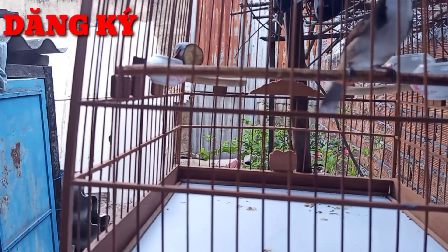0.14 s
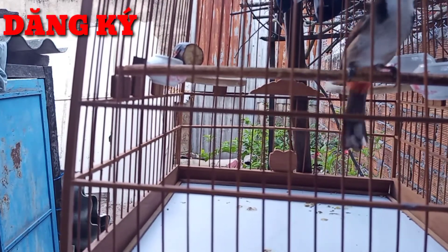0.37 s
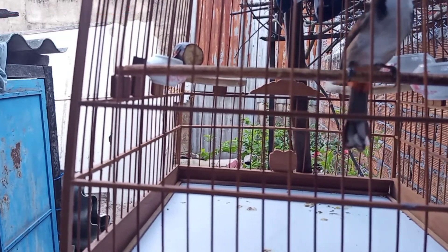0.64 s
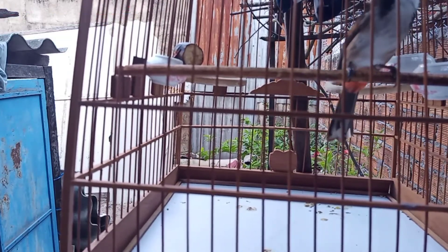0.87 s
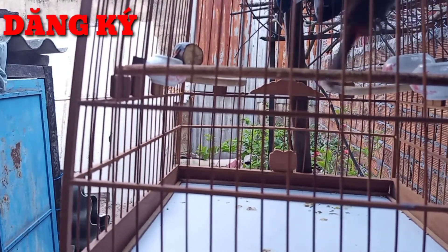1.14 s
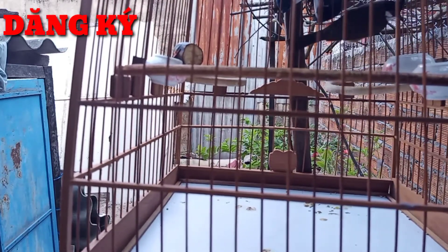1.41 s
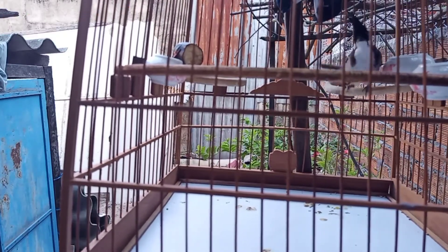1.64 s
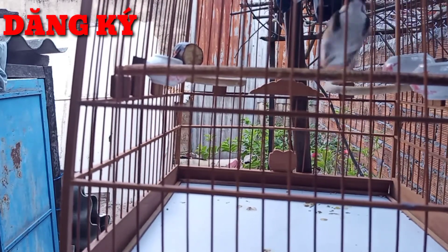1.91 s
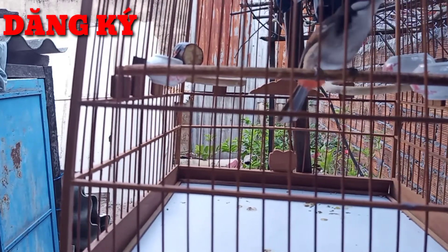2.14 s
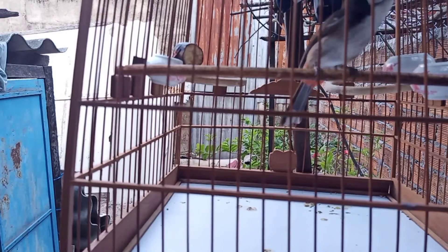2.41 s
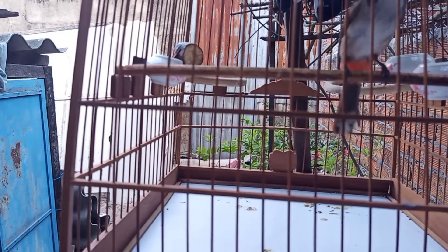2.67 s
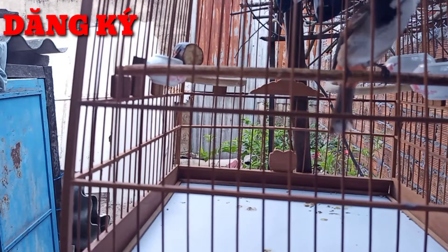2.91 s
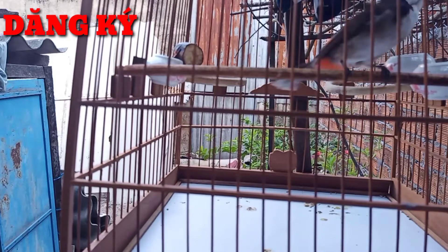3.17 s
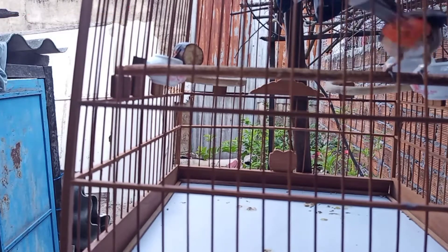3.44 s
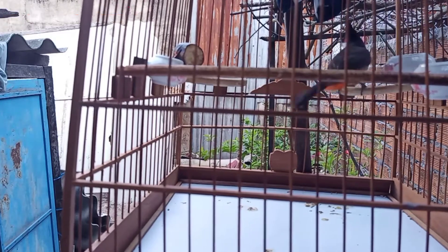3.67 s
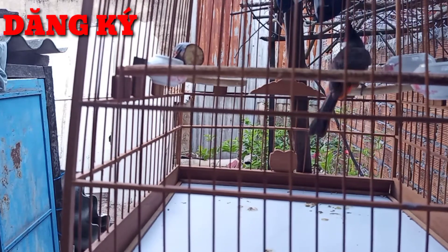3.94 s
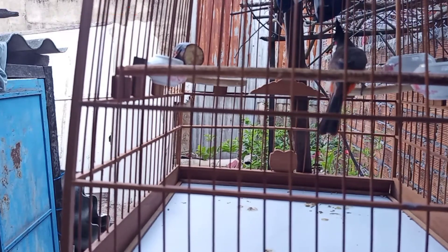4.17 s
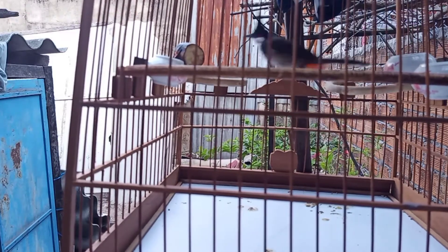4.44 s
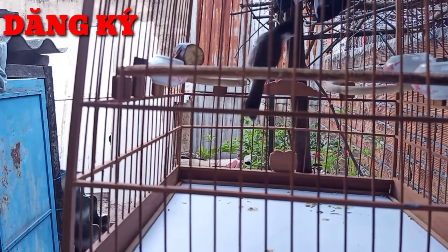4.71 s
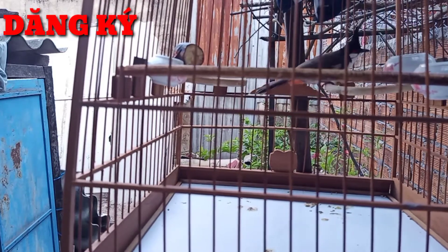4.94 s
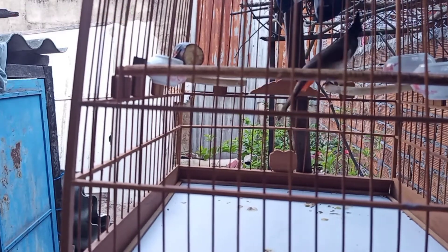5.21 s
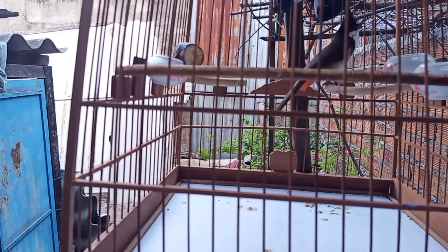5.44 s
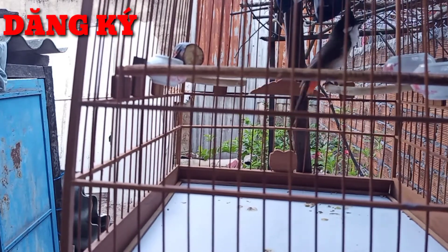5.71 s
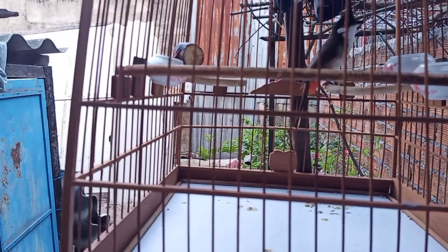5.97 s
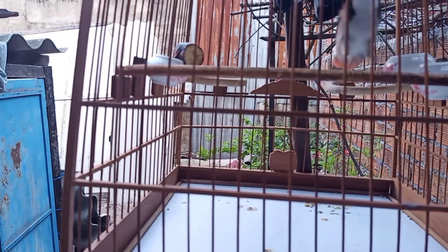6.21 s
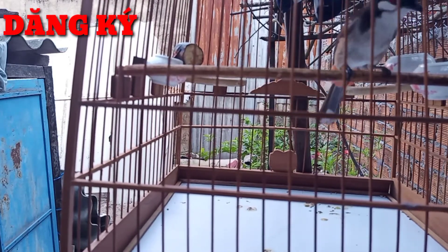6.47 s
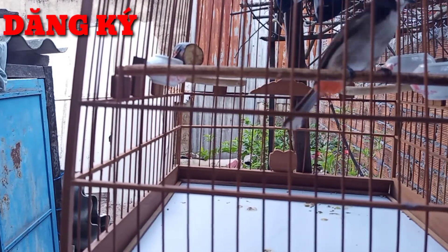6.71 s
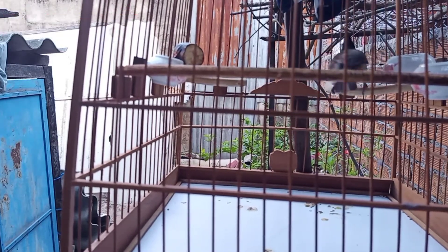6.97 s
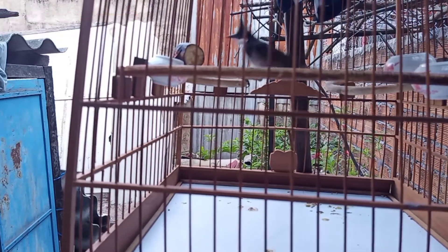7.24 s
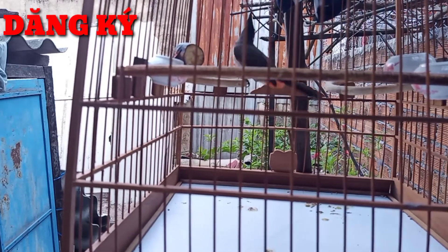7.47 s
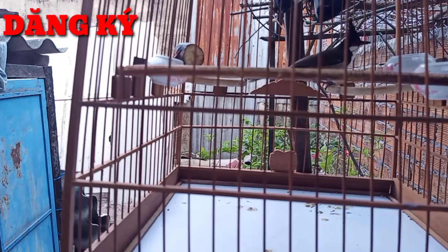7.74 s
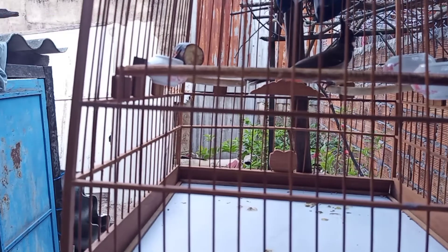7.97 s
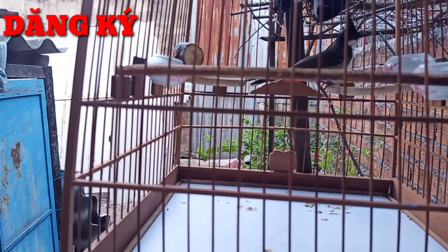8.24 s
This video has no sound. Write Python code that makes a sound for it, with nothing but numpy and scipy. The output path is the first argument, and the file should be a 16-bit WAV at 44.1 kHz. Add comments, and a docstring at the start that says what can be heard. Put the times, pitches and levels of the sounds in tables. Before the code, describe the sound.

Loud, slightly distorted bird warbles burst out in quick phrases, between fainter gliding replies, thin high chirps, perch scratches and low wing thumps.

```python
"""Caged songbird in a walled yard

A caged songbird warbles right beside the microphone, loud enough to overload it: throbbing near-sine
whistles coloured by a throat. Neighbours further off answer in plain gliding whistles, a small bird
chirps high, and a crow is faint in the distance; the near, far and high birds echo off the walls.
Wing gusts thump the microphone as damped low swings, claws scratch the perch in noise bursts,
and shaped noise makes the outdoor wash, the low buffeting and one passing rustle."""
import sys
import numpy as np
from scipy import signal
from scipy.io import wavfile
from scipy.ndimage import uniform_filter1d

SR = 44100
rng = np.random.default_rng(int(sys.argv[2]) if len(sys.argv) > 2 else 0)


def gain_from_db(level_db):
    """Convert decibel levels to linear amplitude factors (20 dB per decade)."""
    decades = np.asarray(level_db, float) / 20
    return 10 ** decades


def digitize_waveform(pressure):
    """Quantize a signal to 16-bit integers and store it at the path in sys.argv[1].

    Rows of a 2-D input are taken as channels; values are limited to [-1, 1].
    """
    field = np.atleast_2d(pressure).T
    bounded = np.clip(field, -1, 1)
    quanta = np.round(bounded * 32767).astype(np.int16)
    wavfile.write(sys.argv[1], SR, quanta)


N = 369116


def evened(x):
    """Scales to rms 1."""
    return x / np.sqrt(np.mean(x ** 2) + 1e-20)


def read(points, hz):
    """Reads a spectrum on a log-frequency axis."""
    f, value = np.transpose(points)
    return np.interp(np.log(hz + 1), np.log(f + 1), value)


def along(curve):
    """Reads a time curve at every sample."""
    s, value = np.transpose(curve)
    return np.interp(np.arange(N) / SR, s, value, left=value[0], right=value[-1])


def add(mix, s, sound):
    """Mixes a sound in at time s."""
    part = mix[round(s * SR):][:len(sound)]
    part += sound[:len(part)]


def wobble(size, smooth):
    """Random drift of rms 1, averaged twice over a number of samples."""
    once = uniform_filter1d(rng.standard_normal(size), int(smooth))
    return evened(uniform_filter1d(once, int(smooth)))


def noise(spectrum, patchy_db, size=10):
    """Random short-time spectra with drifting patches of level, each about size bins wide."""
    hz = np.fft.rfftfreq(1024, 1 / SR)
    a, b, patches = rng.standard_normal((N // 256 + 5, 513, 3)).T
    patches = uniform_filter1d(patches, size, 0)  # across frequency
    patches = evened(uniform_filter1d(patches, 16, 1))  # along time
    z = (a + 1j * b) * gain_from_db(read(spectrum, hz)[:, None] + patchy_db * patches)
    return signal.istft(z, nperseg=1024, noverlap=768)[1][:N]


def wash():
    """Outdoor hiss of shaped noise, patchier in the lows, its level set by its treble."""
    # Each row: frequency in Hz, relative level in dB per Hz.
    spectrum = [(100, -36.5), (160, -17.5), (800, -30), (1400, -32.5), (2400, -29), (7500, -26.5),
                (9000, -38.5), (11200, -50), (15500, -64.5)]
    # Each row: time in seconds, rms level of the treble in dB.
    level_db = [(0.0, -53), (4.05, -56), (4.64, -52.5), (8.37, -49)]
    hiss = noise(spectrum, patchy_db=np.geomspace(5, .4, 513)[:, None])
    band = signal.butter(4, [4500, 6000], "band", fs=SR, output="sos")
    treble = signal.sosfilt(band, hiss)
    return hiss / np.std(treble) * gain_from_db(along(level_db))


def low_tones():
    """Narrow noise bands swell and fade, so faint wavering low tones come and go."""
    bands = noise([(250, -30), (500, 0), (1000, -2), (1600, -30), (4000, -80)], patchy_db=6.5, size=2)
    return gain_from_db(-53) * evened(bands)


def breeze():
    """Lumpy low buffeting of the microphone: bass-heavy noise with a drifting level."""
    # Each row: time in seconds, rms level in dB before the random drift.
    level_db = [(0.0, -37.5), (0.11, -47), (0.37, -54), (1.09, -53), (2.03, -39), (2.4, -37.5), (2.7, -51),
                (4.2, -46.5), (4.66, -51), (5.04, -41.5), (5.8, -54), (8.37, -40)]
    spectrum = [(20, -29.0), (50, -14.5), (90, 3.5), (150, -15), (260, -26), (500, -33), (2000, -85)]
    lumps = noise(spectrum, patchy_db=0.5)
    return gain_from_db(along(level_db) + 2.2 * wobble(N, 1500)) * evened(lumps)


def whistles(notes, waver, flutter_db, fade_s):
    """Plain sine whistles with random waver of pitch and flutter of level."""
    out = np.zeros(N)
    for rows in notes:
        s, hz, db = np.transpose(rows)
        t = np.arange(s[0], s[-1], 1 / SR)
        pitch = np.interp(t, s, hz) * (1 + waver * wobble(len(t), 43))
        phase = 2 * np.pi * np.cumsum(pitch) / SR
        fade = np.minimum(np.minimum(t - t[0], t[-1] - t) / fade_s, 1)
        level = gain_from_db(np.interp(t, s, db) + flutter_db * wobble(len(t), 65))
        add(out, s[0], level * fade * np.sin(phase))
    return out


def chirps():
    """Small bird: each thin whistle swells while it glides to its second pitch, then droops and fades."""
    # Each row: start in seconds, length in seconds, first pitch in Hz, second pitch in Hz,
    # peak level in dB before flutter and distance.
    calls = [(0.066, 0.061, 6490, 7130, -11), (0.367, 0.033, 7170, 7480, -29.5),
             (2.679, 0.082, 6660, 7000, -23), (5.293, .055, 7340, 7450, -25.5),
             (5.306, 0.038, 8370, 8600, -34), (5.676, .08, 6800, 7150, -16),
             (7.345, 0.061, 8650, 8300, -37), (7.361, 0.047, 6870, 7580, -25.5),
             (7.564, .09, 6830, 7190, -14.5)]
    turn, droop, start_db, end_db = 0.72, 0.03, -3, -11  # share of length, share of pitch, dB, dB
    notes = [[(s, first_hz, db + start_db),
              (s + turn * length, second_hz, db),
              (s + length, second_hz * (1 - droop), db + end_db)]
             for s, length, first_hz, second_hz, db in calls]
    return whistles(notes, waver=0.018, flutter_db=3.5, fade_s=0.0052)


def sung():
    """Pitch points and effort of the caged bird's song and soft calls; the calls share one arch."""
    # One list for each song note or part of a note; overlapping parts run on as one note.
    # Each row: time in seconds, pitch in Hz.
    notes = [
        [(0.262, 1197), (0.27, 1565), (0.277, 2997), (0.285, 3160), (0.301, 3535)],
        [(0.402, 1568), (0.412, 1776), (0.423, 2186), (0.428, 2512), (0.436, 1804), (0.468, 1900),
         (0.476, 1760)],
        [(0.506, 1663), (0.53, 1370), (0.535, 2177), (0.545, 3274), (0.568, 3446)],
        [(0.647, 2190), (0.67, 2034), (0.675, 1735), (0.688, 1922), (0.695, 2626), (0.703, 2600), (0.706, 3213),
         (0.735, 3084), (0.74, 2630), (0.747, 1300)],
        [(0.768, 1733), (0.79, 1907), (0.796, 2445), (0.84, 2026), (0.845, 1776), (0.899, 1560)],
        [(2.42, 1112), (2.435, 1523), (2.455, 1936), (2.465, 1744), (2.48, 1988), (2.49, 1925)],
        [(2.606, 1942), (2.625, 2445), (2.642, 3126), (2.66, 3545), (2.68, 3410), (2.698, 3646)],
        [(2.756, 1355), (2.763, 2378), (2.789, 2383)],
        [(2.783, 2810), (2.8, 2738), (2.818, 2500), (2.822, 1764), (2.83, 1080)],
        [(2.852, 1000), (2.865, 1523), (2.874, 1698), (2.882, 2840)],
        [(2.876, 2734), (2.9, 3360), (2.906, 3665), (2.93, 4002), (2.939, 4590)],
        [(3.068, 1644), (3.075, 1876), (3.095, 2007), (3.108, 2384), (3.125, 2068), (3.15, 1984)],
        [(5.25, 1290), (5.265, 1357), (5.28, 1932), (5.295, 2164), (5.319, 1860)],
        [(5.312, 1845), (5.321, 1616), (5.328, 1260), (5.335, 940)],
        [(5.54, 1930), (5.546, 2492), (5.56, 3457), (5.576, 3820)],
        [(5.672, 1448), (5.685, 2570), (5.7, 2603), (5.71, 3090), (5.728, 2730), (5.736, 3120)],
        [(5.766, 1230), (5.785, 2175), (5.795, 2670), (5.81, 2490), (5.816, 3450), (5.835, 3630), (5.851, 3920)],
        [(5.885, 1443), (5.905, 2087), (5.92, 3260), (5.926, 2642), (5.955, 2530), (5.963, 1890)],
        [(5.965, 1760), (5.975, 2237), (5.99, 2420), (6.005, 2196)],
    ]
    # One row for each song note or part of a note: effort at the start in dB, effort at the end in dB,
    # second harmonic in dB; all before the throat.
    effort = [(-1.5, 1.5, -23.5), (-6.5, 3, -33), (0, -1, -27.5), (4.5, -3, -29.5), (-3.5, 2, -32),
              (1.5, 7, -28.5), (3.5, -5, -22), (-14, -14.5, -3), (-0.5, -12.5, -11), (-1, -20, -6.5),
              (-9.5, 7.5, -11), (1.5, -2.5, -29.5), (-2, -11.5, -38.5), (-7, -1.5, -19.5), (-3, 0.5, -18.5),
              (1.5, -7, -25), (-2, 0.5, -21), (-7, 1.5, -28.5), (5.5, -7, -30)]
    # Soft short calls between songs. Each row: start in seconds, length in seconds, reference pitch in Hz,
    # effort in dB, second harmonic in dB; both levels before the throat.
    chucks = [(0.068, 0.035, 2080, -7, -26.5), (1.333, 0.027, 1946, -22, -35),
              (1.713, .043, 1960, -15.5, -37), (1.809, .034, 1866, -14.5, -37),
              (2.056, 0.037, 2026, -9, -37), (6.348, 0.025, 1903, -12.5, -34)]
    # Each row: share of the length, share of the reference pitch.
    arch = [(0, .82), (.22, .68), (.55, 0.98), (.76, 0.62), (1, .8)]
    calls = [([(s + u * length, share * hz) for u, share in arch], (db, db, second_db))
             for s, length, hz, db, second_db in chucks]
    return list(zip(notes, effort)) + calls


def trills():
    """Loudness factor and dip shape 0-1 of the slightly uneven throbbing, over the whole time."""
    # Each row: first dip in seconds, last dip in seconds, throb cycles between them,
    # depth of the loudness dip (1 is full).
    throbbing = [(0.275, 0.302, 4, 1.03), (0.4043, 0.422, 3, 0.48), (0.5384, 0.543, 1, 0.8),
                 (0.672, 0.678, 1, 0.4), (0.702, 0.7343, 3, 0.6), (0.7916, 0.8305, 7, 0.7),
                 (0.866, 0.9, 5, 0.78), (2.431, 2.471, 3, 0.5), (2.609, 2.6168, 2, 0.9),
                 (2.6217, 2.677, 7, 1.13), (2.756, 2.793, 6, 0), (2.802, 2.8057, 3, 0.2),
                 (2.885, 2.8945, 5, 0.41), (2.9167, 2.937, 6, 0.7), (3.107, 3.125, 1, 0.6),
                 (5.5503, 5.571, 4, 0.78), (5.671, 5.709, 6, 1), (5.7205, 5.7246, 1, 1),
                 (5.776, 5.8182, 6, 0.67), (5.906, 5.9244, 4, 0.96), (5.962, 5.973, 1, 0.73),
                 (5.9672, 5.995, 2, 0.7)]
    t, loud, dips = np.arange(N) / SR, np.ones(N), np.zeros(N)
    uneven = 0.08 * wobble(N, 202)  # cycles
    for first, last, throbs, depth in throbbing:
        turns = (t - first) / (last - first) * throbs
        inside = abs(turns - throbs / 2) < throbs / 2 + .5
        dip = (.5 + .5 * np.cos(2 * np.pi * (turns + uneven))) ** 1.4 * inside
        loud = np.minimum(loud, np.clip(0.97 * (1 - depth * dip), 0, 1))
        dips = np.maximum(dips, dip)
    return loud, dips


def songbird():
    """A throbbing, wavering near-sine whistle with fuzzy overtones and air.
    The throat colours the whistle, its harmonics and the air's level, but not the halfway line."""
    # How well the throat lets a tone out. Each row: frequency in Hz, level in dB.
    throat = [(1000, -34.5), (1400, -18.5), (1750, -10), (2000, -6.5), (2500, 1.5), (3200, 1.5), (3600, 2),
              (4400, -11.5), (7000, -8.5), (12000, -28.5)]
    # Higher harmonics before the throat. Each row: multiple of the pitch, relative level in dB.
    higher = [(3, 2.5), (4, 1.5), (5, -4.5)]
    throat_share = .65  # share of the throat colour on the harmonics
    attack_s, release_s = 0.01, 0.0056
    loud, dips = trills()
    out = np.zeros(N)
    for rows, (start_db, end_db, held_db) in sung():
        s, pitch = np.transpose(rows)
        at = np.arange(round(s[0] * SR), round(s[-1] * SR))
        hz = np.interp(at / SR, s, pitch)
        peak_db = np.linspace(start_db, end_db, len(at)) + read(throat, hz)
        second_db = held_db + throat_share * read(throat, 2 * hz) - peak_db

        # Strained notes, those with a strong second harmonic, get more fast pitch jitter.
        rasp = 0.035 * gain_from_db(held_db) * wobble(len(at), 9)
        waver = 0.017 * wobble(len(at), 35)
        phase = 2 * np.pi * np.cumsum(hz * (1 + waver + rasp - 0.1 * dips[at])) / SR

        upper = sum(gain_from_db(db + throat_share * read(throat, k * hz)) * np.sin(k * phase) for k, db in higher)
        overtones = gain_from_db(second_db) * np.sin(2 * phase) + gain_from_db(0.76 * second_db - 8.5) * upper
        # Strain also brings a line halfway between the first and second harmonic.
        overtones += gain_from_db(2 * held_db - 4.5 - peak_db) * np.sin(3 * phase / 2)
        overtones *= gain_from_db(3.5 * wobble(len(at), 30))

        air = gain_from_db(-38.5) * wobble(len(at), 1) * (1 + np.sin(phase))  # a puff of hiss once a cycle
        rise, fall = (at - at[0]) / attack_s, (at[-1] - at) / release_s
        fade = np.minimum(np.minimum(rise, fall) / SR, 1)
        voice = loud[at] * np.sin(phase) + np.sqrt(loud[at]) * (overtones + air)
        out[at] += gain_from_db(peak_db + 1.34 * wobble(len(at), 90)) * fade * voice
    return out


def yard(x, first_s, t60, step_db):
    """Sparse random-sign echoes off walls and roofs; their level shifts by step_db from 85 to 99 ms."""
    # Colour of the echoes. Each row: frequency in Hz, level in dB.
    walls = [(1000, 1.5), (3500, 8.5), (7000, -0.5)]
    taps = np.zeros(SR)
    at = np.arange(int(first_s * SR), SR - 20, 20)
    taps[at + rng.integers(0, 20, at.shape)] = rng.choice([-1., 1.], at.shape)
    hz, t, z = signal.stft(taps, SR, nperseg=256)
    fall_db = -60 * t / t60 + step_db * np.clip((t - .085) / 0.014, 0, 1)
    tail = signal.istft(z * gain_from_db(fall_db + read(walls, hz)[:, None]), SR, nperseg=256)[1]
    return signal.fftconvolve(x, tail / np.linalg.norm(tail))[:N]


def answers():
    """Neighbours further off whistle shared syllables, each time with its own length, pitch and level."""
    # Each row: start in seconds, syllable name, level in dB added to the syllable's own,
    # length factor, pitch factor.
    replies = [(1.02, "glide", -53.5, 1.3, 1.05), (1.418, "warble", -38.5, 1.07, 1),
               (1.653, "whip", -26.5, 1.94, 1.083), (1.836, "step up", -23, 1.15, 0.98),
               (1.945, "stairs", -13.5, 0.99, 0.99), (2.079, "fall", -9, 0.77, 1.013),
               (2.143, "close", -23, 0.79, 1.037), (4.051, "chip", -33, 0.73, 0.98),
               (4.051, "chip", -41.5, 1.5, .52), (4.39, "whip", -20, 1.28, 1.046),
               (4.555, "step down", -15.5, 1, 1), (4.594, "hook", -16, 1.1, 1.02),
               (4.654, "hook", -17.5, 1.01, 0.96), (4.725, "low hook", -23, 1, 1),
               (7.063, "chip", -35, 1.06, 0.93), (7.276, "whip", -22, 1.25, 1.077),
               (7.433, "step up", -20.5, 1.2, 1.006), (7.542, "stairs", -8, 0.97, 0.98),
               (7.683, "fall", -5.5, 0.79, .99), (7.747, "close", -19, 0.85, 1.02)]
    # One list for each syllable name; each row: seconds after the start and pitch in Hz, both before
    # the factors, and relative level in dB.
    syllables = { "glide": [(0, 2490, -4), (.21, 2960, -7.5)], "warble": [(0, 2710, -1), (.022, 1990, -8),
                 (.047, 2640, -6), (.062, 2000, -16)], "chip": [(0, 2766, -7), (.016, 2715, 5.5),
                 (.023, 2010, -4.5), (.032, 2320, -8), (.06, 2040, -3)], "whip": [(0, 1610, -12),
                 (.01, 2700, 0.5), (.022, 3300, 3), (.038, 3600, -45)], "step up": [(0, 1810, -17),
                 (.014, 2080, 1.5), (.019, 2550, -8), (.045, 2320, 0.5)], "step down": [(0, 2460, -14.5),
                 (.02, 2437, -4.5), (.026, 1843, -16), (.053, 1960, -5)], "stairs": [(0, 2330, -9.5),
                 (.012, 2284, -7.5), (.018, 2683, 0.5), (.027, 3092, -8.5), (.057, 3070, -5),
                 (.086, 3864, -5), (.098, 3380, -20)], "fall": [(0, 3055, -8), (.034, 3003, -4),
                 (.042, 2710, 1), (.061, 2670, -22.5)], "close": [(0, 2304, -4.5), (.025, 2170, 8.5)],
                 "hook": [(0, 1597, -20.5), (.018, 2408, -6.5), (.038, 2950, -0.5), (.057, 2820, -38)],
                 "low hook": [(0, 1580, 1), (.01, 1993, -9.5), (.025, 1810, -5), (.05, 2120, -4)], }
    notes = [[(s + stretch * u, lift * hz, level_db + db) for u, hz, db in syllables[name]]
             for s, name, level_db, stretch, lift in replies]
    return whistles(notes, waver=.009, flutter_db=3, fade_s=.003)


def claws():
    """Claws on the perch: dry broadband scratches with a low knock of the perch."""
    # Each row: time in seconds, level in dB before the scratch and knock shares.
    scratches = [(1.26, -29), (1.2785, -19.5), (1.35, -32), (1.386, -27.5)]
    out, t = np.zeros(N), np.arange(1500) / SR
    for s, db in scratches:
        grit = uniform_filter1d(rng.standard_normal(1500), size=4)
        scratch = 0.5 * grit * np.exp(-t / 0.0079)
        knock = 0.35 * np.sin(2 * np.pi * 450 * t) * np.exp(-t / 0.0011)
        add(out, s, gain_from_db(db) * (scratch + knock))
    return out


def gusts():
    """Each wing gust makes the microphone membrane swing a few damped low cycles."""
    # Each row: time in seconds, level in dB before a 10 dB lift and the decay.
    puffs = [(1.485, -20), (1.531, -24.5), (1.597, -30), (1.621, -26), (1.651, -22.5), (1.805, -33),
             (1.945, -30), (2.011, -25), (2.346, -34), (3.608, -37.5)]
    out, t = np.zeros(N), np.arange(3000) / SR
    for s, db in puffs:
        swing = np.sin(2 * np.pi * (92 + 25 * rng.random()) * t)
        shape = np.exp(-t / 0.0098) * np.minimum(t / 0.0028, 1)
        add(out, s, gain_from_db(db + 10.0) * swing * shape)
    return out


def rustle():
    """Something brushes past: shaped noise that rises and falls in level."""
    # Each row: frequency in Hz, relative level in dB per Hz.
    spectrum = [(100, -8), (600, -4), (6500, -14), (10000, -30.5), (13000, -69.5)]
    # Each row: time in seconds, rms level in dB.
    level_db = [(6.5, -75), (6.53, -41.5), (6.65, -40.5), (6.7, -33.5), (6.93, -37), (7.05, -44.5),
                (7.15, -48)]
    return evened(noise(spectrum, patchy_db=.4)) * gain_from_db(along(level_db))


def crowing():
    """Faint distant crowing: one long wavering whistle."""
    # Each row: time in seconds, pitch in Hz, level in dB; pitch and level before waver and flutter.
    crow = [(7.5, 805, -59), (7.64, 786, -47.5), (8.05, 847, -40.5)]
    return whistles([crow], waver=.025, flutter_db=3.5, fade_s=.03)


def scene():
    """Near, far and high birds with their echoes, over the distant crowing, air and perch sounds."""
    near, far, high = songbird(), answers(), chirps()
    mix = near + gain_from_db(-17.5) * yard(near, first_s=0.0036, t60=0.17, step_db=8.5)
    mix += gain_from_db(-1.5) * far + gain_from_db(-5.0) * yard(far, first_s=0.0033, t60=0.25, step_db=1.5)
    mix += gain_from_db(-3.5) * high + gain_from_db(-6) * yard(high, first_s=.003, t60=0.32, step_db=-1.5)
    mix += crowing() + gusts() + breeze() + claws()
    mix += wash() + low_tones() + rustle()
    return mix[None]


def top_cut(x):
    """Nothing passes above the cut-off."""
    return signal.sosfilt(signal.butter(12, 15780, fs=SR, output="sos"), x)


def record(dry):
    """The input stage overloads on the loudest notes, the negative side a little earlier; then a low-pass."""
    ceiling, knee = .73 + .012 * np.sign(dry), 9
    clipped = dry / (1 + abs(dry / ceiling) ** knee) ** (1 / knee)
    lowpass = signal.firwin(255, 15700, window=("kaiser", 9), fs=SR)
    finished = signal.oaconvolve(clipped, lowpass[None], "same")
    return top_cut(finished)


dry = scene()
out = record(dry)
digitize_waveform(out)
```